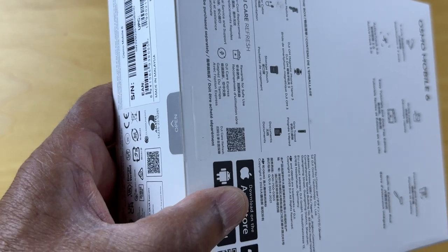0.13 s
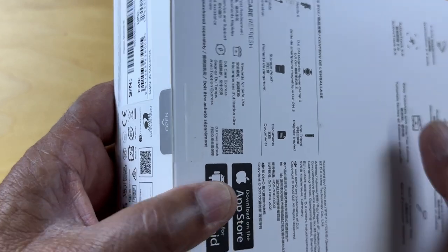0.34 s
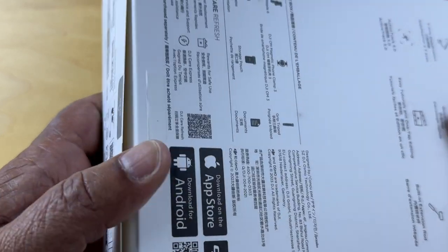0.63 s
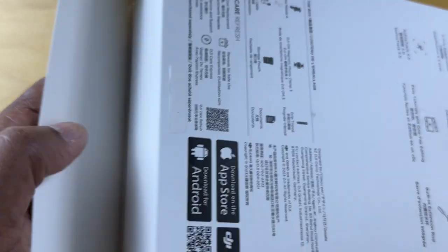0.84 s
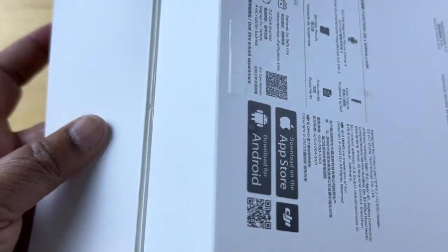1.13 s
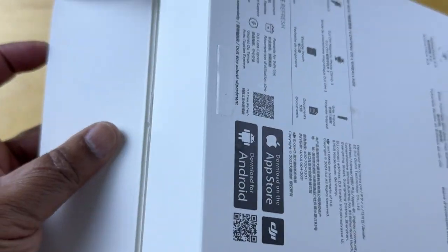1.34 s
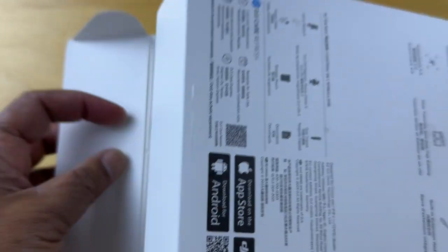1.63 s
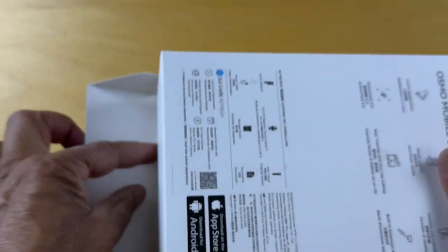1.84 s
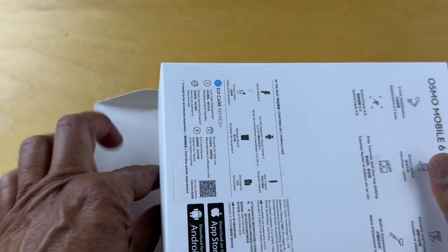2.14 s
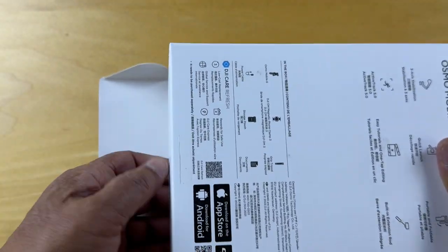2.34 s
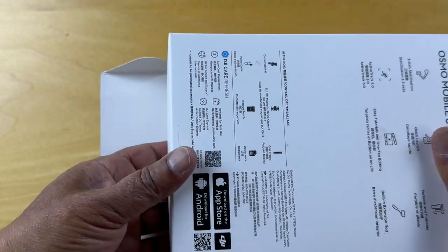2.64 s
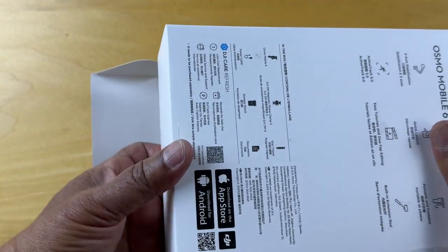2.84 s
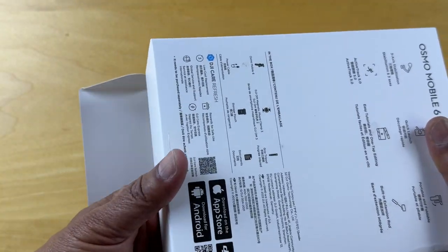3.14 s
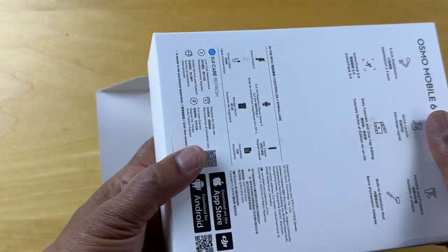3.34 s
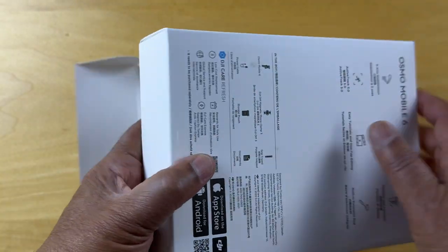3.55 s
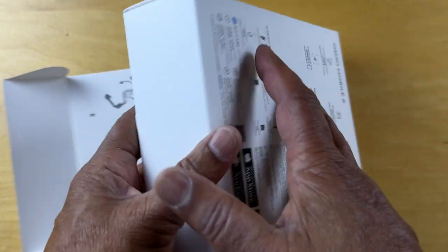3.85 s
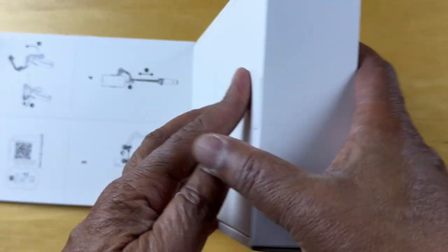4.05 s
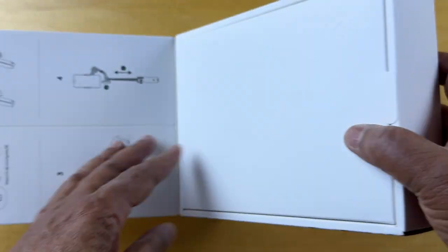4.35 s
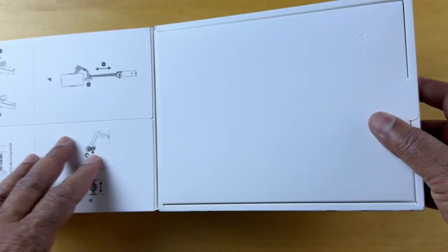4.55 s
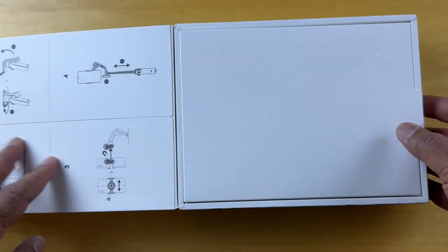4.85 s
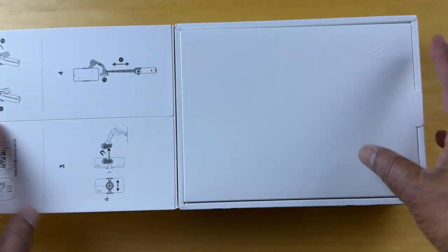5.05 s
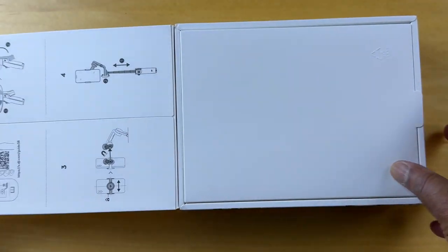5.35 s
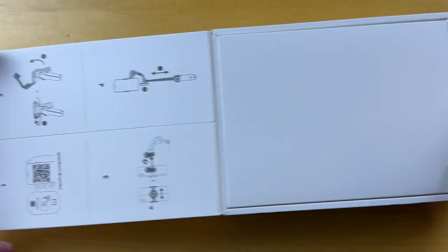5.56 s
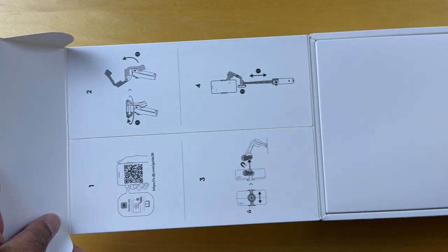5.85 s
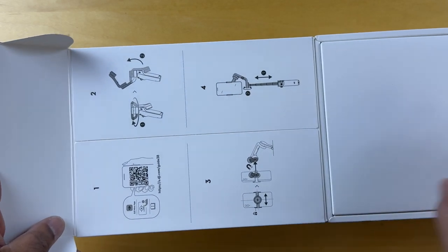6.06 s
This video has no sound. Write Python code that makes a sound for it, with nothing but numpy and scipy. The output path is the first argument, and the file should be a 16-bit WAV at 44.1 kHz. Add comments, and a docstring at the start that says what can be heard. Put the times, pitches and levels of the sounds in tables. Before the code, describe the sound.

Hands handle a stiff card box close to a stereo microphone. Soft skin-on-card rubbing comes first, then a flap scrapes free with a sinking note and low bumps. Dry clicks and hollow knocks come in fits, a second scrape leads into heavy thumps as the box is turned and set down, hard raps follow, then the lid slides flat with smooth hiss. Small furnished room, short dull echo, faint low hum.

```python
"""Cardboard box opened on a table

A stiff card box is handled close by: a tuck flap pulls free, skin and card rub, the box is turned over
and set down, the lid is slid flat. Blows and low thumps ring decaying box modes, knocks and snaps ring
panel modes, and sliding is random force through the same modes plus surface hiss. Edges chafe as noise in
one resonance, narrow or broad, and flicks ring as sines. A short room echo and a quiet low hum lie behind."""
import sys
import numpy as np
from scipy import signal
from scipy.fft import rfft, irfft, next_fast_len
from scipy.io import wavfile

SR = 44100
rng = np.random.default_rng(int(sys.argv[2]) if len(sys.argv) > 2 else 0)


def pcm_store(signal):
    """Save signal as 16-bit PCM."""
    levels = np.round(np.clip(np.atleast_2d(signal), -1, 1) * 32767)
    wavfile.write(sys.argv[1], SR, levels.astype(np.int16).T)


N = 272979
TIME = np.arange(N) / SR
RING_TIME = TIME[:SR // 4]
CONTROL_TIME = TIME[::20]
LEFT_RIGHT = np.array([[1], [-1]])


def from_db(db):
    """Decibels to gain."""
    return 10 ** (np.asarray(db) / 20)


def rms_one(x):
    """Scale to unit rms."""
    return x / np.sqrt(np.mean(x ** 2) + 1e-20)


def unit_blow(x):
    """Scale to the energy of 10 ms at unit rms."""
    return x * np.sqrt(.01 * SR / (np.sum(x ** 2) + 1e-20))


def at_hz(points, hz):
    """Read a table on a log-frequency axis."""
    f, value = np.transpose(points)
    return np.interp(np.log(hz + 1), np.log(f), value)


def coloured(x, spectrum):
    """Causal minimum-phase filter, by folding the cepstrum of the given spectrum."""
    size = 4096
    gain_db = at_hz(spectrum, np.arange(size // 2 + 1) * SR / size)
    cepstrum = irfft(np.log(from_db(gain_db)))
    cepstrum[1:size // 2] *= 2
    cepstrum[size // 2 + 1:] = 0
    impulse = irfft(np.exp(rfft(cepstrum)))
    return signal.oaconvolve(x, impulse)[:len(x)]


def resonate(x, hz, width_hz):
    """Two-pole resonance with about unit gain at its peak."""
    r = np.exp(-np.pi * width_hz / SR)
    zeros = np.array([1, 0, -1]) * (1 - r * r) / 2
    poles = [1, -2 * r * np.cos(2 * np.pi * hz / SR), r * r]
    return signal.lfilter(zeros, poles, x)


def drift(knots_per_s):
    """Random wander of unit rms, straight between knots."""
    knots = rng.standard_normal(4000)
    return rms_one(np.interp(TIME * knots_per_s, np.arange(len(knots)), knots))


def dying(t60_s):
    """Envelope that falls 60 dB in t60_s."""
    return np.exp(-np.log(1000) * RING_TIME / t60_s)


def rising(rise_s):
    """Exponential onset."""
    return 1 - np.exp(-RING_TIME / rise_s)


def ring(hz, gains, t60_s):
    """Sum of decaying sines."""
    return gains @ (np.sin(2 * np.pi * hz[:, None] * RING_TIME) * dying(t60_s[:, None]))


def add(out, s, sound):
    """Mix a sound in at a given time."""
    start = max(0, int(s * SR))
    out[start:start + len(sound)] += sound[:N - start]


# hum spectrum: hz, gain_db
ROOM_HUM = [(70, 2), (125, -13.5), (200, 6.5), (320, -6.5), (900, -25), (3000, -34)]
ROOM_HUM_DB = -69


def room_hum():
    """Steady noise, weighted to the lows."""
    return from_db(ROOM_HUM_DB) * rms_one(coloured(rng.standard_normal(N), ROOM_HUM))


STROKE_ATTACK_S, STROKE_RELEASE_DB_PER_S = 0.007, 394


def stroke(start_s, length_s, swell_db=0, release_db_per_s=STROKE_RELEASE_DB_PER_S):
    """Effort of one sliding motion: a quick attack, a hold that swells or eases, a release."""
    t = np.maximum(CONTROL_TIME - start_s, 0)
    hold_db = swell_db * (np.minimum(t / length_s, 1) - .5)
    release_db = np.minimum(release_db_per_s * np.maximum(t - length_s, 0), 200)
    return np.minimum(t / STROKE_ATTACK_S, 1) * from_db(hold_db - release_db)


# skin or card sliding on card; levels before the trims in rubbing():
# start_s, length_s, rasp_db, swell_db (start to end), drum_over_rasp_db, hiss_over_rasp_db, grainy_share (0-1)
STROKES = [(0.305, 0.12, -65, 3.5, 6, 10.5, 0.4), (0.492, 0.08, -64, -5, 3, 4.5, 0.27),
           (0.618, 0.38, -61.5, 7, -6, 4.5, 0.17), (0.757, 0.17, -55.5, -8, -4, 5, 0.4),
           (1.008, 0.0087, -55, 17, 3.5, 1.5, 0), (1.086, 0.14, -58.5, -2, -6.5, -3.5, 0.1),
           (1.293, 0.042, -57, 11.5, -10.5, -4, 0.08), (1.501, 0.1, -60.5, 15.5, -1, -5, 0.52),
           (1.659, 0.12, -62.5, -6, 3, -8, 0.4), (1.787, 0.22, -58.5, 1.5, -4, -9.5, 0.53),
           (2.094, 0.059, -66, 20, -6, -12, 0.34), (2.162, 0.13, -49, 2, -4.5, -8.5, 0.43),
           (2.297, 0.16, -59.5, -18.5, -10, -1, 0), (2.542, 0.12, -56.5, -5, 3.5, -6.5, 0.14),
           (2.686, 0.22, -56.5, -2.5, 2.5, -8, 0.54), (2.956, 0.074, -58.5, 18, 2.5, -5, 0.51),
           (3.111, 0.16, -58, 1.5, 2, -4.5, 0.59), (3.4, 0.083, -54.5, 9.5, 3, -11, 0.5),
           (3.674, 0.29, -60.5, 13, 1.5, 8.5, 0.3), (4.034, 0.15, -57, 7.5, -4.5, -1.5, 0.01),
           (4.293, 0.19, -59, 9, -10, 3, 0.13), (4.518, 0.46, -69, -3, -19, 7.5, 0.17),
           (4.749, 0.037, -61, 15.5, 5, 5, 0.8), (5.025, 0.072, -50.5, 0, -8, -3, 0.7),
           (5.171, 0.12, -54, -8.5, -3.5, -6.5, 0.66), (5.271, 0.33, -57, 8, -5.5, 0, 0.19),
           (5.516, 0.27, -52, -3.5, -30, 0, 0), (5.806, 0.078, -58.5, -4.5, -9.5, -4, 0.64),
           (5.902, 0.35, -75, 0, 1.5, -16, 0.92)]
# hands shifting on the box as they hold it: start_s, length_s
GRIPS = [(0.303, 0.97), (2.129, 2.56), (5.026, 0.79)]
GRIP_DRUM_DB, GRIP_RASP_DB, GRIP_HISS_DB, GRIP_GRAINY = -64.5, -63.5, -73, 0.55
# an edge scuffs before it strikes: levels relative to the tick
SCUFF_S, SCUFF_STOP_DB_PER_S = 0.017, 2011
SCUFF_RASP_DB, SCUFF_HISS_DB = 0.5, -9
# parts skid to rest after a blow: levels relative to its thump, knock and tick
SKID_DRUM_DB, SKID_RASP_DB, SKID_HISS_DB = -15, -24, -23.5
SKID_FADE_DB_PER_S, SKID_GRAINY = 157.5, 0.34


def motions():
    """Every sliding motion as (effort, drum_db, rasp_db, hiss_db, grainy_share)."""
    for start_s, length_s, rasp_db, swell_db, drum_db, hiss_db, grainy in STROKES:
        effort = stroke(start_s, length_s, swell_db)
        yield effort, rasp_db + drum_db, rasp_db, rasp_db + hiss_db, grainy
    for s, _, thump_db, knock_db, tick_db in BLOWS:
        scuff = stroke(s - SCUFF_S, SCUFF_S, release_db_per_s=SCUFF_STOP_DB_PER_S)
        yield scuff, -np.inf, tick_db + SCUFF_RASP_DB, tick_db + SCUFF_HISS_DB, SKID_GRAINY
        skid = stroke(s, STROKE_ATTACK_S, release_db_per_s=SKID_FADE_DB_PER_S)
        yield skid, thump_db + SKID_DRUM_DB, knock_db + SKID_RASP_DB, tick_db + SKID_HISS_DB, SKID_GRAINY
    for start_s, length_s in GRIPS:
        yield stroke(start_s, length_s), GRIP_DRUM_DB, GRIP_RASP_DB, GRIP_HISS_DB, GRIP_GRAINY


def sliding():
    """Motions add in power: drum, rasp and hiss levels, and the grainy share weighted by rasp power."""
    efforts, *levels_db, grainy = map(np.array, zip(*motions()))
    weights, powers = from_db(levels_db) ** 2, efforts ** 2
    drum, rasp, hiss = weights @ powers + 1e-20
    share = np.clip((weights[1] * grainy) @ powers / rasp, 0, 1)
    controls = (np.sqrt(drum), np.sqrt(rasp), np.sqrt(hiss), share)
    return [np.interp(TIME, CONTROL_TIME, control) for control in controls]


def friction(grainy, size_db=1.5, flutter_db=2.5, slips_per_s=380):
    """Force of sliding: smooth drag on the coating plus tiny slips of uneven size."""
    sizes = from_db(size_db * np.minimum(rng.exponential(1, N), 3))
    slips = (rng.random(N) < slips_per_s / SR) * rng.choice([-1, 1], N) * sizes
    force = np.sqrt(grainy) * rms_one(slips) + np.sqrt(1 - grainy) * rng.standard_normal(N)
    return force * from_db(flutter_db * np.sqrt(grainy) * drift(70))


def mode_shape(grainy, crossings_per_s=30):
    """A jerky contact crosses nodes and bellies, so a mode comes and goes; a smooth slide is steadier."""
    steady = (1 - grainy) ** 2
    return rng.choice([-1, 1]) * steady + np.sqrt(1 - steady ** 2) * drift(crossings_per_s)


def fibres(grainy, count=6, snaps_per_s=24):
    """Where the card catches, fibres let go in lone snaps, from dull to bright."""
    out = np.zeros(N)
    for hz in np.geomspace(700, 5000, count):
        snaps = (rng.random(N) < snaps_per_s * grainy / SR) * from_db(rng.uniform(-12, 0, N))
        out += signal.oaconvolve(snaps, snap(hz))[:N]
    return out


def off_the_panel(x, share=0.36, lag_s=0.000938, wander=0.228):
    """Hiss also bounces off the nearest panel; the comb that this makes moves with the hand."""
    return x + share * np.interp(TIME - lag_s * (1 + wander * drift(2.4)), TIME, x)


# spectra: hz, gain_db
DRUM = [(60, -9.5), (170, -1), (480, -1), (700, -9), (1200, -32)]
RASP = [(300, -20), (520, -15), (620, -0.5), (950, 1.5), (1400, -1), (2200, 2), (3400, -4), (4300, -1),
        (7000, -30)]
HISS = [(1800, -32), (3200, 0.5), (4200, -9.5), (5500, 1.5), (9300, 5), (11000, 2.5), (12700, -72.5),
        (14200, 5.5), (15600, -4.5)]


def rubbing(rasp_trim_db=-3.5, fibres_db=3, hiss_trim_db=2.5, direct=1.0, drum_width_hz=27, damping=4.2,
            apart=.27):
    """Sliding drums on the hollow box, rasps through the panel modes and hisses at the surface."""
    drum_level, rasp_level, hiss_level, grainy = sliding()
    force = friction(grainy)
    hollow = sum(resonate(force * mode_shape(grainy), hz, drum_width_hz) for hz in BOX_MODES_HZ)
    panels = sum(resonate(force * mode_shape(grainy), hz, damping / t60_s)
                 for hz, _, t60_s in zip(*panel_modes()))
    drum = rms_one(coloured(hollow, DRUM))
    rasp = from_db(rasp_trim_db) * rms_one(coloured(panels + direct * friction(grainy), RASP))
    rasp = rasp + from_db(fibres_db) * fibres(grainy)
    hiss = rms_one(coloured(off_the_panel(force + .5 * rng.standard_normal(N)), HISS))
    # short waves reach the two ports differently
    band = signal.butter(2, [6200, 10500], "band", fs=SR, output="sos")
    side = signal.sosfilt(band, rng.standard_normal(N))
    hiss = rms_one(hiss + apart * rms_one(side) * LEFT_RIGHT)
    return drum_level * drum + rasp_level * rasp + from_db(hiss_trim_db) * hiss_level * hiss


# echo spectrum: hz, gain_db
ECHO_COLOUR = [(150, 1), (650, 9), (1500, -1.5), (3000, -49), (16000, -3.5)]


def room(x, wet_db=-14, t60_s=.16, first_wall_s=.0035, width=.55):
    """A small furnished room answers with a short dull tail, partly alike at both ports."""
    swell = dying(t60_s) * (1 - np.exp(-(RING_TIME / first_wall_s) ** 2))
    swell = swell / np.sqrt(np.sum(dying(t60_s) ** 2))
    tails = [coloured(rng.standard_normal(len(RING_TIME)), ECHO_COLOUR) * swell for _ in range(2)]
    shared, side = [signal.oaconvolve(x, tail)[:N] for tail in tails]
    side = signal.sosfilt(signal.butter(2, 450, "high", fs=SR, output="sos"), side)
    return from_db(wet_db) * (shared + width * side * LEFT_RIGHT)


# bending of the card panels: hz, level_db
PANEL_MODES = [(560, -2.5), (644, -0.5), (775, -4), (925, -3.5), (1123, 1.5), (1250, 2), (1400, 1),
               (1552, 0.5), (1780, -5), (2050, -5.5), (2430, -3), (2790, -9), (3310, -3.5)]
PANEL_T60_AT_1_KHZ_S = 0.032


def panel_modes():
    """Pitch, level and ring time of the panel modes; higher ones die sooner."""
    hz, level_db = np.transpose(PANEL_MODES)
    return hz, level_db, PANEL_T60_AT_1_KHZ_S / np.sqrt(hz / 1000)


def bending(x, lag_at_1_khz_s=0.0004):
    """Bending waves run faster at high pitch, so a snap reaches the edge as a quick falling chirp."""
    hz = np.arange(len(x) + 1) * SR / (2 * len(x))
    phase = 4 * np.pi * lag_at_1_khz_s * np.sqrt(1000 * hz)
    return irfft(rfft(x, 2 * len(x)) * np.exp(-1j * phase))[:len(x)]


# contact spectrum: hz, gain_db
CRACK = [(300, -4.5), (600, 7), (1400, -3.5), (2200, -8), (3400, -18.5), (6500, -35.5)]


def knock(scatter_db=3, crack=0.81, crack_t60_s=0.017, crack_rise_s=0.00063, detune=0.028, ring_spread=0.48):
    """A panel rings over a short contact crunch; the grip varies its modes at each blow."""
    hz, level_db, t60_s = panel_modes()
    strength, pitch, damping = rng.standard_normal((3, len(hz)))
    gains = from_db(level_db + scatter_db * strength) * rng.choice([-1, 1], len(hz))
    modes = ring(hz * np.exp(detune * pitch), gains, t60_s * np.exp(ring_spread * damping))
    crunch = rng.standard_normal(len(RING_TIME)) * dying(crack_t60_s) * rising(crack_rise_s)
    contact = coloured(crunch, CRACK)
    return unit_blow(bending(unit_blow(modes) + crack * unit_blow(contact)))


# edge spectrum: hz, gain_db
TICK = [(3500, 2), (6000, -2), (9500, 0), (16000, -23)]


def tick(t60_s=0.013, tail_db=-21, tail_t60_s=0.15, rise_s=0.0018):
    """A cut edge scuffs past another: a bright snap with a faint tail."""
    envelope = (dying(t60_s) + from_db(tail_db) * dying(tail_t60_s)) * rising(rise_s)
    return unit_blow(coloured(rng.standard_normal(len(RING_TIME)) * envelope, TICK))


def snap(hz, tick_db=-15, breadth=1.4):
    """Card gives way at once: a very short crack and a light panel ring around a pitch of its own."""
    crack = knock(crack=1.45, crack_t60_s=0.0081) + from_db(tick_db) * tick()
    return unit_blow(resonate(crack, hz, breadth * hz))


# creases and corners giving way with a dry click: time_s, centre_hz, level_db
CREASES = [(0.38, 464, -48.5), (0.569, 1070, -54.5), (1.189, 1190, -52), (1.341, 2180, -39.5),
           (1.669, 2500, -68), (1.869, 1900, -48.5), (2.176, 1390, -49), (2.27, 1100, -51),
           (2.286, 1000, -47), (2.455, 1830, -38.5), (2.59, 1540, -41), (2.736, 600, -44.5),
           (2.763, 1140, -36), (2.801, 590, -35.5), (3.017, 1800, -42), (3.034, 1350, -36),
           (3.056, 1630, -38), (3.1, 1200, -44), (3.439, 1200, -47.5), (3.595, 2520, -41), (4.46, 830, -30),
           (4.796, 1420, -33), (5.048, 2600, -46), (5.091, 1300, -46), (5.165, 800, -43),
           (5.195, 1900, -51), (5.238, 1390, -51), (5.373, 2200, -54), (5.932, 4480, -62.5),
           (5.979, 7000, -58), (6.008, 2360, -62), (6.157, 9200, -58.5)]


def creases():
    """Sharp dry clicks, faint to loud, played without a thump."""
    out = np.zeros(N)
    for s, centre_hz, level_db in CREASES:
        add(out, s, from_db(level_db) * snap(centre_hz))
    return out


# air and large faces of the box: hz
BOX_MODES_HZ = [62, 84, 108, 136, 178, 228, 280, 345, 400, 465, 535]
BOX_T60_AT_200_HZ_S = 0.067


def thump(pitch_hz, spread_octaves=0.64, rise_s=0.0019, heave=0.11):
    """The struck place selects box modes around one pitch; the push also heaves the lower ones."""
    hz = np.array(BOX_MODES_HZ)
    t60_s = BOX_T60_AT_200_HZ_S / np.sqrt(hz / 200)
    gains = 1 / (1 + (np.log2(hz / pitch_hz) / spread_octaves) ** 2) + heave * (hz < pitch_hz / 2)
    # a short ring starts higher for the same energy
    gains = gains / np.sqrt(t60_s) * rng.choice([-1, 1], len(hz))
    return unit_blow(ring(hz, gains, t60_s) * rising(rise_s))


# flaps and corners striking the box:
# time_s, thump_pitch_hz, thump_db, knock_db, tick_db (before tick_trim_db)
BLOWS = [(0.416, 308, -49.5, -66, -51.5), (0.74, 240, -31.5, -66, -50.5), (0.902, 328, -39, -52, -49),
         (2.247, 330, -45.5, -38.5, -66), (2.568, 209, -39, -45, -66), (2.793, 443, -36.5, -35, -92),
         (2.811, 179, -38.5, -43.5, -56.5), (2.851, 262, -49.5, -41.5, -62), (3.02, 402, -33.5, -34.5, -52),
         (3.379, 373, -39.5, -37.5, -57), (3.395, 238, -46, -40, -46.5), (3.601, 316, -31.5, -40.5, -51),
         (3.631, 174, -38, -54, -49), (3.98, 198, -31.5, -42.5, -46.5), (3.989, 177, -31.5, -44.5, -51),
         (4.324, 334, -41.5, -40.5, -83), (4.336, 205, -38, -39, -70), (4.451, 398, -52, -25, -47.5),
         (4.457, 405, -31, -25.5, -47), (4.799, 395, -44, -29, -49), (4.813, 260, -36.5, -42, -49.5),
         (4.901, 340, -48, -30.5, -59), (4.918, 278, -41, -43.5, -79), (5.023, 189, -51, -47.5, -66)]


def blows(tick_trim_db=7.0):
    """Every blow thumps the box, knocks a panel and ticks at an edge."""
    out = np.zeros(N)
    for s, pitch_hz, thump_db, knock_db, tick_db in BLOWS:
        add(out, s, from_db(thump_db) * thump(pitch_hz))
        add(out, s, from_db(knock_db) * knock())
        add(out, s, from_db(tick_db + tick_trim_db) * tick())
    return out


# low thumps of the box alone: time_s, pitch_hz, level_db
LOW_THUMPS = [(0.675, 260, -46), (0.752, 109, -30.5), (0.795, 143, -36), (0.973, 84, -46.5),
              (1.022, 83, -38.5), (1.349, 97, -50.5), (1.721, 273, -48.5), (2.272, 320, -40),
              (2.895, 276, -44), (3.213, 410, -46), (3.469, 352, -61), (3.693, 328, -45.5),
              (3.967, 177, -26.5), (3.986, 68.5, -35), (4.015, 130, -34.5), (4.058, 134, -40),
              (4.8, 364, -24.5), (5.061, 75, -40.5), (5.097, 376, -44)]


def low_thumps():
    """Low thumps of the box modes, soft to heavy, some beneath a harder knock."""
    out = np.zeros(N)
    for s, pitch_hz, level_db in LOW_THUMPS:
        add(out, s, from_db(level_db) * thump(pitch_hz, spread_octaves=0.33))
    return out


# the tuck flap, later the lid, pulled free:
# start_s, length_s, first_hz, last_hz, note_db, scrape_db, swell_db, judder (nepers lost per slip cycle)
PULLS = [(0.784, 0.169, 2450, 1600, -46.5, -55.5, 1.5, 1.6),
         (3.752, 0.222, 2970, 2110, -55.5, -53, 12, 0.76)]
SLIPS_PER_S, GAP_WIDTH_HZ = 130, 400


def gap_note(slips, turning):
    """A gliding resonance and its octave: shift to 0 Hz, one-pole low-pass, shift back."""
    note = 0
    for k in (1, 2):
        pole = np.exp(-np.pi * k * k * GAP_WIDTH_HZ / SR)
        note = note + (signal.lfilter([1], [1, -pole], slips / turning ** k) * turning ** k).real
    return note


def pulls(jitter=0.44, edge_hz=3400, coating_hz=7200, scrape_width_hz=2200, ragged_db=1.5):
    """Uneven slips of dying grit scrape the edge and sound a note that sinks as the gap opens."""
    out = np.zeros(N)
    for s, length_s, first_hz, last_hz, note_db, scrape_db, swell_db, judder in PULLS:
        t = TIME[:int(length_s * SR)]
        cycles = np.cumsum(SLIPS_PER_S * (1 + jitter * drift(SLIPS_PER_S)[:len(t)])) / SR
        grit = rng.standard_normal(len(t)) * from_db(ragged_db * drift(600)[:len(t)])
        slips = grit * np.exp(-judder * (cycles % 1))
        glide_hz = first_hz * (last_hz / first_hz) ** (t / length_s)
        turning = np.exp(2j * np.pi * np.cumsum(glide_hz) / SR)
        note = rms_one(resonate(gap_note(slips, turning), first_hz, first_hz))
        scrape = resonate(slips, edge_hz, scrape_width_hz) - resonate(slips, coating_hz, scrape_width_hz)
        effort = from_db(swell_db * (t / length_s - .5)) * signal.windows.tukey(len(t), .2)
        add(out, s, (from_db(note_db) * note + from_db(scrape_db) * rms_one(scrape)) * effort)
    return out


# an edge chafes briefly: centre_s, length_s, pitch_hz, width_hz, level_db
CHAFES = [(1.018, 0.034, 2830, 2130, -46.5), (1.072, 0.11, 3160, 685, -63),
          (1.338, 0.015, 1550, 1510, -43.5), (4.386, 0.22, 800, 246, -57),
          (5.075, 0.024, 2700, 2960, -47.5), (5.538, 0.064, 930, 443, -51.5)]


def chafes():
    """Quick stick and slip of an edge: noise swelling and fading in one resonance, narrow or broad."""
    out = np.zeros(N)
    for centre_s, length_s, hz, width_hz, level_db in CHAFES:
        tone = resonate(rng.standard_normal(len(RING_TIME)), hz, width_hz)
        tone = resonate(tone, hz, 2 * width_hz)[-int(length_s * SR):]
        add(out, centre_s - length_s / 2, from_db(level_db) * rms_one(tone * np.hanning(len(tone))))
    return out


# a free edge of card flicked, ringing on one note: time_s, pitch_hz, note_db
FLICKS = [(1.923, 2210, -51.5), (3.465, 1275, -46.5), (5.025, 5330, -60), (5.111, 1894, -42.5),
          (5.193, 947, -43)]
FLICK_T60_CYCLES = 65


def flicks(rise_s=0.0028):
    """The edge slips off a finger with a light knock and tick, and rings out."""
    out = np.zeros(N)
    for s, hz, note_db in FLICKS:
        note = np.sin(2 * np.pi * hz * RING_TIME) * dying(FLICK_T60_CYCLES / hz) * rising(rise_s)
        add(out, s, from_db(note_db) * (unit_blow(note) + .5 * (knock() + .5 * tick())))
    return out


def scene():
    """The handled box, its room and the background hum."""
    box = blows() + low_thumps() + creases() + flicks() + pulls() + chafes() + rubbing()
    return box + room(box.mean(axis=0)) + room_hum()


# the two microphone ports part in the treble: hz, left_lead_rad
PORT_PHASE = [(200, 0), (400, .12), (690, .33), (1050, .05), (6700, 0), (9560, -1.9), (10800, -2.95),
              (13500, -3.2), (15500, -4.6)]
# the right port hears the low mids a little louder: hz, left_minus_right_db
PORT_BALANCE = [(170, 0), (330, -1.3), (700, -1), (1800, 0)]
CUTOFF_HZ = 15900


def record(dry):
    """Two close ports differ in phase and level; deepest bass rolled off, top cut steeply."""
    dry = signal.sosfilt(signal.butter(2, 42, "high", fs=SR, output="sos"), dry)
    size = next_fast_len(N + SR // 10)
    hz = np.arange(size // 2 + 1) * SR / size
    half = .5 * LEFT_RIGHT
    ports = np.exp(1j * half * at_hz(PORT_PHASE, hz)) * from_db(half * at_hz(PORT_BALANCE, hz))
    low_pass = 1 / np.sqrt(1 + (hz / CUTOFF_HZ) ** 240)
    return irfft(rfft(dry, size) * ports * low_pass, size)[:, :N]


dry = scene()
out = record(dry)
pcm_store(out)
```